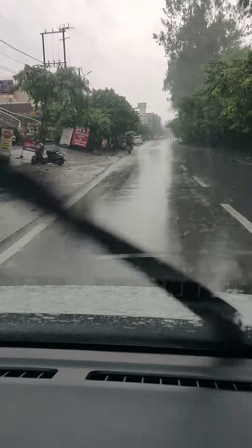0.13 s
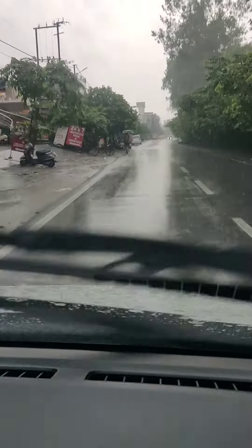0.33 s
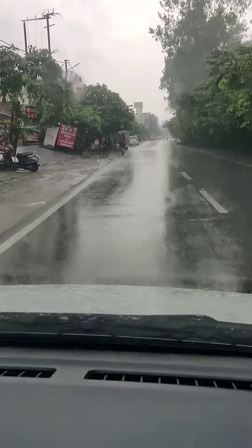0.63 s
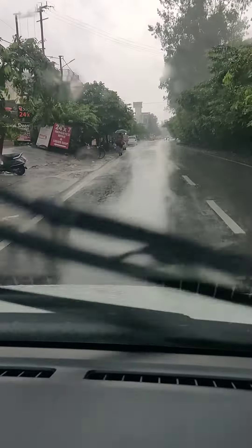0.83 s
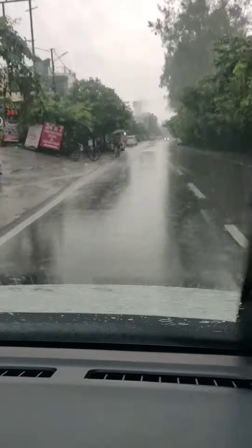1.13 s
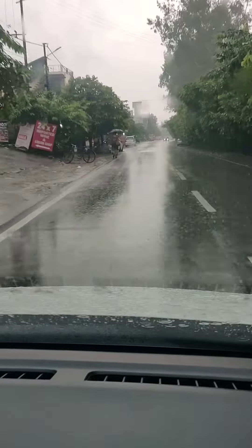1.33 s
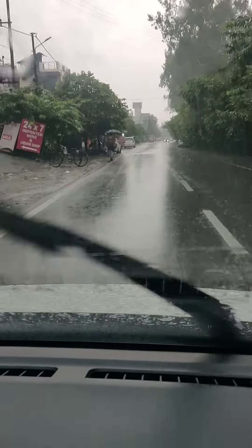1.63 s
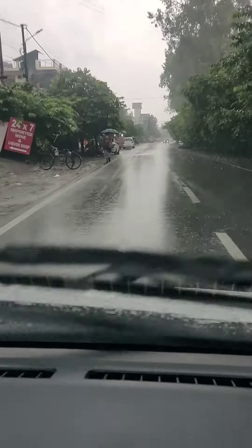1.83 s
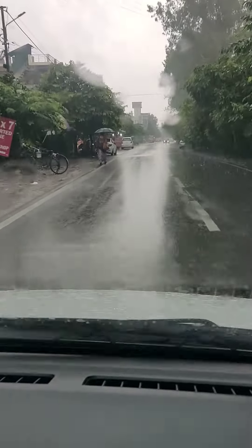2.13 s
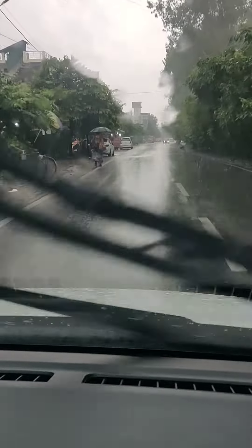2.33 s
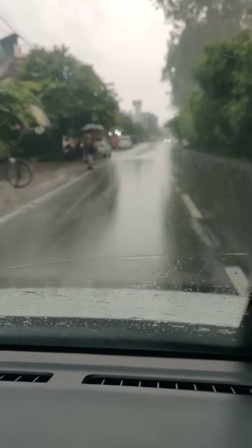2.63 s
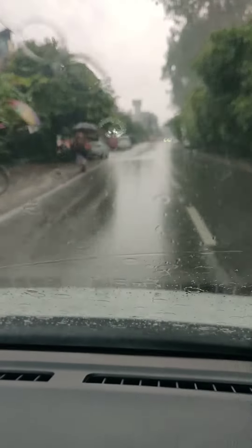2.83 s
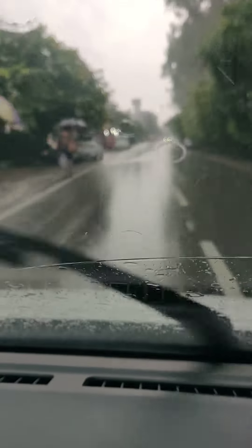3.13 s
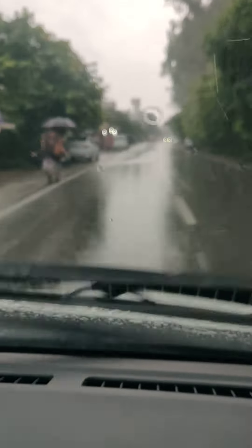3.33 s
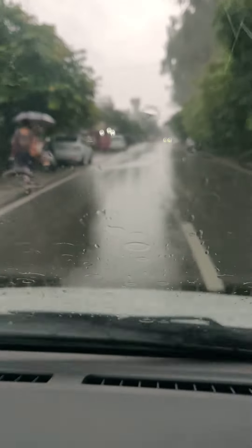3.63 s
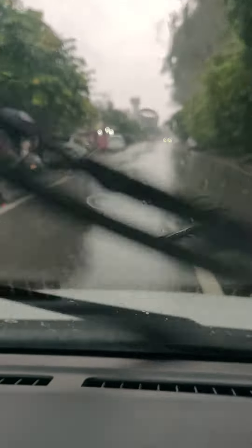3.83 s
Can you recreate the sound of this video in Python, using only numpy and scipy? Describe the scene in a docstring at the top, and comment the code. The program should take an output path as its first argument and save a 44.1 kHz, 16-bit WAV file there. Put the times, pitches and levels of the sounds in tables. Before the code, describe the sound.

Low, boomy road and engine rumble inside a car moving on a wet road, captured by a phone near the windscreen. Brief silence, then it fades in, bass arriving at 0.2 s. Muffled air and spray hiss continues throughout. Wiper motor hum swells early and again around 3.3 s; dull thuds come near 0.7, 1.5, 2.2, 3.0 and 3.7 s. Faint drops tick; wheels knock at 2.3 s.

```python
"""Inside a car on a wet road, heard by a phone near the windscreen: it opens, fades in, then lets the bass in.
Throughout, road texture rings the cabin modes, engine orders drone, and filtered noise makes air and spray.
The wiper motor, a narrow noise hum, swells early; from 0.7 s decaying mode tones thud at wiper reversals.
From 0.9 s a few noise ticks are big drops; near 2.3 s the wheels knock over a patch, in the same modes;
after 3 s the motor hum swells again."""
import sys
import numpy as np
from scipy import signal
from scipy.fft import rfft, irfft
from scipy.io import wavfile
from scipy.ndimage import uniform_filter1d

SR = 44100
rng = np.random.default_rng(int(sys.argv[2]) if len(sys.argv) > 2 else 0)


def bounce(signal):
    """Save signal as a 16-bit WAV file at the path given by the first command-line argument."""
    frames = np.transpose(np.atleast_2d(signal))
    limited = np.clip(frames, -1, 1)
    pcm = np.round(limited * 32767).astype(np.int16)
    wavfile.write(sys.argv[1], SR, pcm)


def invert_db(x):
    """Field ratio 10**(x/20) for x, a level in decibels (scalar or array-like)."""
    u = np.asarray(x, float) / 20
    return 10 ** u


N = 176400

# phone fade-in: (time [s], gain [dB]); all other levels are ahead of it
FADE_IN = [(0.0, -134), (0.04, -136), (0.07, -71.5), (0.08, -67), (0.14, -62.5), (0.33, -53), (1.06, -49),
           (2.16, -47), (2.33, -46), (4.0, -45.5)]
OPENS_S, BASS_OPENS_S, BASS_HELD_DB = 0.066, 0.21, -20

# cabin and panel modes: (centre [Hz], width of one resonator [Hz], road level [dB], blow level [dB])
CABIN_MODES = [(27.8, 15.3, 19, -5), (53.2, 7.5, 13.5, 5), (70.5, 11.3, 13, -1), (100.8, 15.4, 15.5, 4),
               (129.44, 12.8, 17.5, -4), (152.7, 5.5, 2, -1), (193.3, 15.5, 9, 1), (256.4, 59, 8.5, 0.5),
               (339.6, 44, 7.5, -5.5), (427, 110, 1.5, -3.5), (515.5, 27, -0.5, -4.5), (595.5, 86, -12, -5)]
# road roughness: (time [s], suspension level [dB], cabin boom level [dB])
ROAD_ROUGHNESS = [(.25, -7, -0.5), (.55, 8, -0.5), (.6, -11, -11), (.72, 5, 1.5), (.9, -1.5, -2),
                  (1.07, 6, -0.5), (1.17, 6, -3.5), (1.34, 2.5, -2.5), (1.45, 4.5, -1.5), (1.57, 1, -3.5),
                  (1.86, 0, -4), (1.95, 4.5, 6.5), (2.05, -6, -1), (2.15, 2, -7.5), (2.3, 1, 3.5),
                  (2.47, 0, -11.5), (2.7, -6, 3), (2.78, 4, -3), (2.87, -12, -0.5), (2.95, 4.5, -3.5),
                  (3.05, -1.5, 4), (3.17, 2.5, -4.5), (3.27, 2, 6), (3.4, -7, -5.5), (3.47, -1, 1.5),
                  (3.71, 2.5, -3), (4, -7, -4.5)]
STEADINESS = 0.76  # 0 free noise, 1 even drone

# air and spray spectrum, relative: (frequency [Hz], density [dB per Hz])
WASH_SPECTRUM = [(12, -35), (20, -14), (60, -5.5), (134, -8.5), (254, -15), (375, -17.5), (610, -23),
                 (660, -24), (1300, -29), (2960, -37.5), (4800, -44.5), (6840, -46.5), (7800, -54),
                 (9050, -60.5), (11500, -62.5), (15800, -60.5)]
WASH_DB = 20.5
DROPS_PER_S, DROP_DB, DROP_SPREAD_DB = 1000, -14, 3.5

# likeness of the two microphone ports: (frequency [Hz], correlation [0-1])
PORT_LIKENESS = [(60, 1), (130, 0.91), (290, 0.99), (640, 0.64), (1200, 0), (16000, 0.032)]
# port balance: (frequency [Hz], left minus right [dB])
PORT_BALANCE = [(60, 1.5), (110, 0), (200, 3), (380, 0), (700, 5), (1290, 3.0), (2380, 4), (4400, 2),
                (8120, -1.5), (15000, -7)]

# engine firing rate: (time [s], rate [Hz])
FIRING_RATE = [(0, 25), (1.3, 25), (2, 26), (3.3, 26.6), (4, 26)]
# engine orders reaching the cabin: (multiple of firing rate [-], level [dB])
ENGINE_ORDERS = [(1, 4.9), (2, 9.1), (4, 4.2), (5, 14.2)]
ENGINE_WAVER, ENGINE_FLICKER_DB = 0.02033, 3.5  # share of rate, level; both per unit of walk()

# largest rain drops on the glass: (time [s], level [dB])
BIG_DROPS_AT = [(0.931, 6), (1.201, 7), (2.226, 2), (3.901, 2)]
BIG_DROP_HZ, BIG_DROP_DECAY_S = 3000, 0.0017

# wiper motor hum: (time [s], level [dB])
MOTOR_LEVEL = [(.25, 6), (.5, 7), (.7, 11.5), (.9, 7.5), (1.05, 9.5), (1.28, 6.5), (1.4, 2), (1.65, 4.5),
               (2, -12.5), (2.5, -6), (3, -3), (3.35, 6.5), (3.6, 0.5), (4, -10)]
MOTOR_HZ, MOTOR_WIDTH_HZ = 605, 95  # width of one resonator

# wiper reversals: (time [s], level [dB], hold [s], centre [Hz])
WIPER_THUDS = [(0.690, 18, 0.03, 336), (0.748, 23, 0.028, 190), (1.486, 23, 0.012, 180),
               (1.514, 19, 0.035, 450), (1.516, 26, 0.03, 185), (2.177, 23, 0.022, 400),
               (2.225, 21, 0.04, 186), (2.975, 17, .03, 500), (3.000, 25, 0.03, 190),
               (3.655, 16, 0.03, 340), (3.710, 23, 0.03, 195)]
# wheels over the patch: (time [s], level [dB], hold [s], centre [Hz])
WHEEL_KNOCKS = [(2.292, 24, 0.075, 100), (2.346, 24, 0.02, 520), (2.374, 27, .028, 260),
                (2.380, 22, 0.022, 540), (2.398, 23, 0.022, 105)]
BLOW_SIDE_DB, BLOW_FALL_DB_PER_OCT2, BLOW_DAMPING = -14, 16, 3  # damping multiplies mode width


def col(table, k, x):
    """Column k of a table read at x."""
    a = np.array(table, float)
    return np.interp(x, a[:, 0], a[:, k])


def at_hz(table, hz):
    """Spectrum table read on a log-frequency axis."""
    a = np.array(table, float)
    return np.interp(np.log(hz), np.log(a[:, 0]), a[:, 1])


def unit(x):
    """Scale to rms 1."""
    return x / np.sqrt(np.mean(x ** 2))


def ring(x, hz, width_hz):
    """Steep resonance: two equal resonators in series, gain 1 at the centre."""
    b, a = signal.iirpeak(hz, hz / width_hz, fs=SR)
    return signal.lfilter(b, a, signal.lfilter(b, a, x))


def walk(rate_hz):
    """Slow random wander, rms about 0.65: held random values smoothed twice."""
    hold = int(SR / rate_hz)
    steps = np.repeat(rng.standard_normal(N // 200), hold)[:N]
    return 0.87 * uniform_filter1d(uniform_filter1d(steps, hold), hold)


def place(a, b, hz):
    """Mix two unrelated signals to the port correlation and balance at this pitch."""
    likeness = np.clip(at_hz(PORT_LIKENESS, hz), 0, 1)
    pan = invert_db(at_hz(PORT_BALANCE, hz) / 2)
    mid = np.sqrt((1 + likeness) / 2) * a
    side = np.sqrt((1 - likeness) / 2) * b
    return np.array([(mid + side) * pan, (mid - side) / pan])


def wash():
    """Air and spray with rain drops: half-octave noise bands swell together and flicker alone."""
    white = rng.standard_normal((2, N))
    hits = rng.random((2, N)) < DROPS_PER_S / SR
    drops = hits * invert_db(DROP_SPREAD_DB * rng.exponential(size=(2, N))) * np.sign(white)
    air = rfft(white)
    wet = invert_db(DROP_DB) * rfft(unit(drops))
    f = np.maximum(np.arange(air.shape[1]) * SR / N, 1)
    spectrum = (air + wet * (f > 900)) * invert_db(at_hz(WASH_SPECTRUM, f))
    swell = 0.7 * walk(8.0) + 0.9 * walk(16.0)
    out = 0
    for octave in np.arange(4, 14.5, 0.5):  # log2 of centre in Hz
        share = np.clip(1 - abs(np.log2(f) - octave) * 2, 0, 1)
        a, b = irfft(spectrum * share, N)
        out = out + invert_db(swell + 0.89 * walk(20.0)) * place(a, b, 2 ** octave)
    return invert_db(WASH_DB) * unit(out)


def droning(hz, width_hz):
    """Noise ringing in one mode, long swells partly evened out as in a steadily driven drone."""
    x = ring(rng.standard_normal(N), hz, width_hz)
    power = uniform_filter1d(x ** 2, int(0.2 * SR))
    return unit(x / power ** (STEADINESS / 2))


def road(t):
    """Road texture rings each cabin mode; low modes follow the suspension, the rest the boom."""
    out = 0
    for hz, width_hz, db, _ in CABIN_MODES:
        a, b = (droning(hz, width_hz) for _ in range(2))
        rough_db = col(ROAD_ROUGHNESS, 1 if hz < 65 else 2, t)
        rough_db = rough_db * min(1, 150 / hz) ** 2  # high modes follow less
        out = out + invert_db(db + rough_db + 0.45 * walk(7.78)) * place(a, b, hz)
    return out


def engine(t):
    """Firing-rate orders waver together in pitch and boom with the cabin."""
    rate_hz = col(FIRING_RATE, 1, t) * (1 + ENGINE_WAVER * walk(5.0))
    phase = 2 * np.pi * np.cumsum(rate_hz) / SR
    out = 0
    for order, db in ENGINE_ORDERS:
        tone = np.sqrt(2) * np.sin(order * phase + 2 * np.pi * rng.random())
        boom_db = col(ROAD_ROUGHNESS, 1 if order < 2.5 else 2, t)
        out = out + invert_db(db + boom_db + ENGINE_FLICKER_DB * walk(6.1)) * tone
    return out * invert_db(np.array([[0.5], [-0.5]]))  # left, right


def big_drops(t):
    """Big drops tick on the windscreen: band noise cut on sharply, dying exponentially."""
    b, a = signal.butter(1, BIG_DROP_HZ * np.array([0.5, 2]), "band", fs=SR)
    noise = unit(signal.lfilter(b, a, rng.standard_normal((2, N))))
    envelope = 0
    for start, db in BIG_DROPS_AT:
        decay = np.exp(-np.maximum(t - start, 0) / BIG_DROP_DECAY_S)
        envelope = envelope + invert_db(db) * (t >= start) * decay
    return noise * envelope


def wiper_motor(t):
    """Motor hum: rough narrow-band noise that swells as the arms sweep."""
    a, b = (unit(ring(rng.standard_normal(N), MOTOR_HZ, MOTOR_WIDTH_HZ)) for _ in range(2))
    return invert_db(col(MOTOR_LEVEL, 1, t)) * place(a, b, MOTOR_HZ)


def blows(t, table):
    """Blows strike, hold and die in the cabin modes, strongest near their centre, each mode detuned."""
    out = np.zeros((2, N))
    for start, db, hold_s, centre_hz in table:
        on = slice(int(start * SR), int((start + 0.3) * SR))
        s = np.maximum(t[on] - start, 0)
        attack = np.minimum(s / 0.0012, 1)
        dying_s = np.maximum(s - hold_s, 0)
        phases = 2 * np.pi * rng.random((len(CABIN_MODES), 2, 1))
        detunes = 1 + 0.038 * rng.standard_normal(len(CABIN_MODES))
        y = 0
        for (hz, width_hz, _, hit_db), phase, detune in zip(CABIN_MODES, phases, detunes):
            shape = attack * np.exp(-np.pi * BLOW_DAMPING * width_hz * dying_s)
            mode_db = db + hit_db - BLOW_FALL_DB_PER_OCT2 * np.log2(hz / centre_hz) ** 2
            y = y + invert_db(mode_db) * shape * np.sin(2 * np.pi * hz * detune * s + phase)
        side = invert_db(BLOW_SIDE_DB) * y[1]
        out[:, on] += [y[0] + side, y[0] - side]
    return out


def wheel_knocks(t):
    """Wheels knock over the patch, exciting the cabin modes."""
    return blows(t, WHEEL_KNOCKS)


def wiper_thuds(t):
    """Wipers thud at each reversal, exciting the cabin modes."""
    return blows(t, WIPER_THUDS)


def scene():
    """Sum of everything heard in the cabin."""
    t = np.arange(N) / SR
    background = wash() + road(t) + engine(t)
    return background + big_drops(t) + wiper_motor(t) + wheel_knocks(t) + wiper_thuds(t)


def top_cut(x):
    """Nothing passes above the cut-off."""
    return signal.sosfilt(signal.butter(12, 15770, fs=SR, output="sos"), x)


def record(dry):
    """The phone opens, fades in and lets the bass in a moment later; a short ramp ends it."""
    t = np.arange(N) / SR
    bass = signal.sosfiltfilt(signal.butter(3, 110, fs=SR, output="sos"), dry)
    held = invert_db(BASS_HELD_DB)
    bass_gain = held + (1 - held) * np.clip((t - BASS_OPENS_S) / 0.0059, 0, 1)
    opening = np.clip((t - OPENS_S) / 0.0019, 0, 1)
    closing = np.clip((t[-1] - t) / 0.0017, 0, 1)
    mix = (dry - (1 - bass_gain) * bass) * invert_db(col(FADE_IN, 1, t)) * opening * closing
    return top_cut(mix)


dry = scene()
out = record(dry)
bounce(out)
```